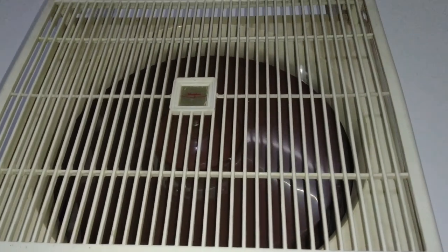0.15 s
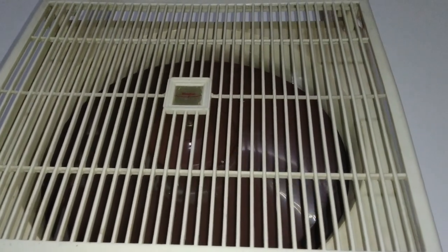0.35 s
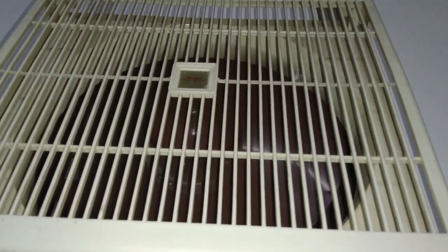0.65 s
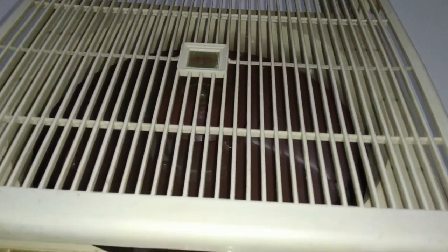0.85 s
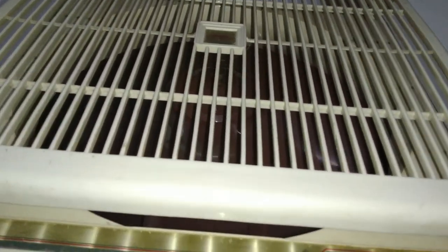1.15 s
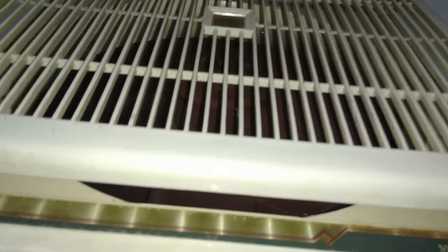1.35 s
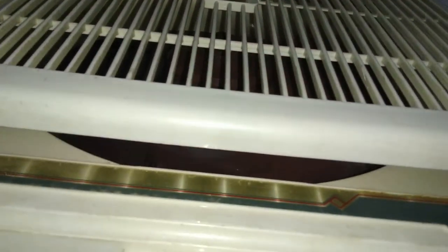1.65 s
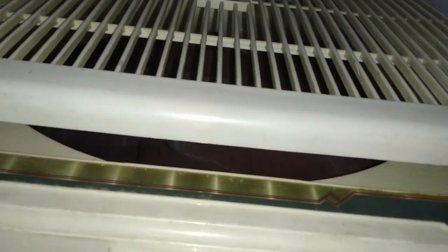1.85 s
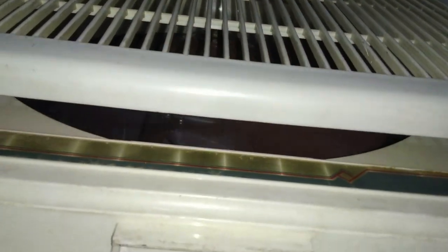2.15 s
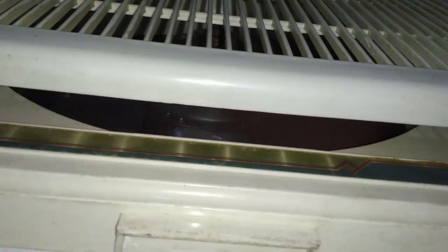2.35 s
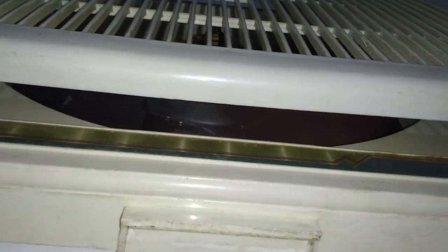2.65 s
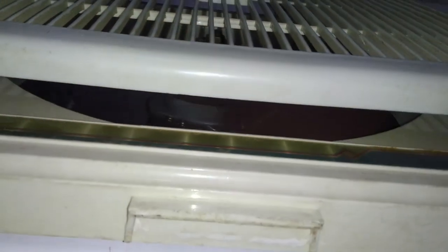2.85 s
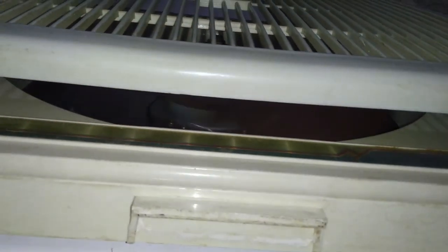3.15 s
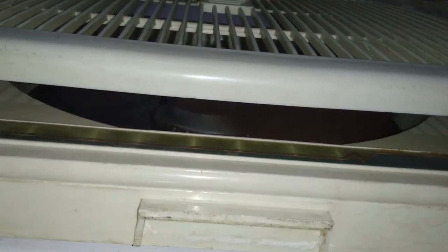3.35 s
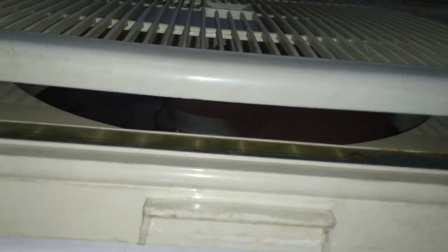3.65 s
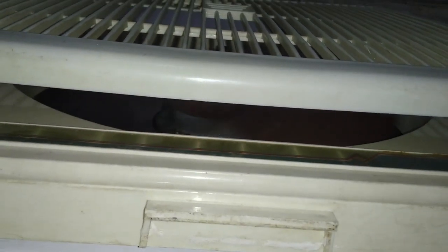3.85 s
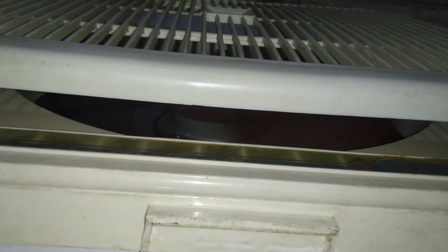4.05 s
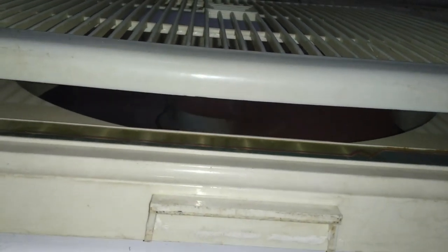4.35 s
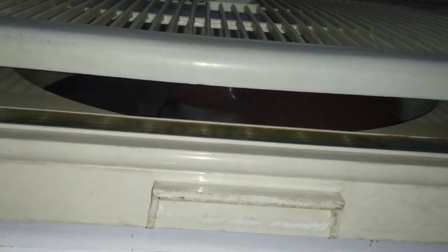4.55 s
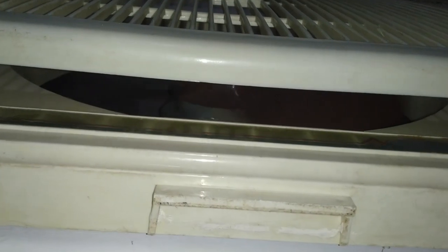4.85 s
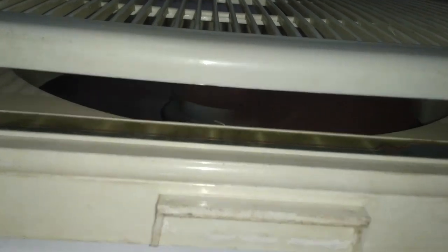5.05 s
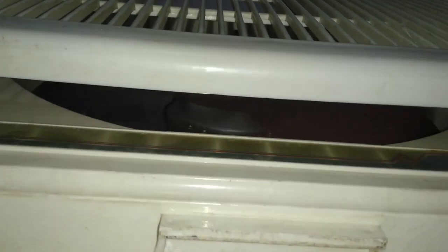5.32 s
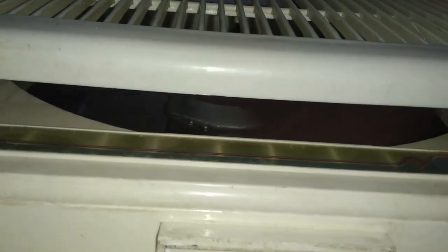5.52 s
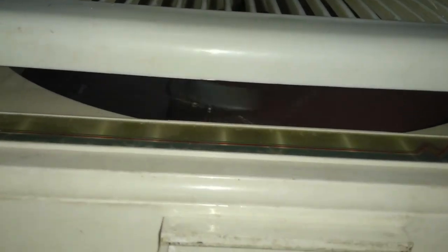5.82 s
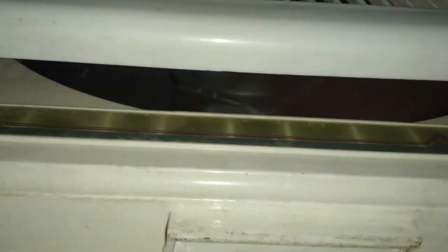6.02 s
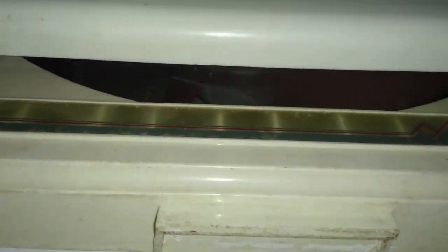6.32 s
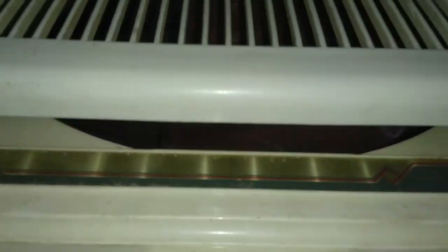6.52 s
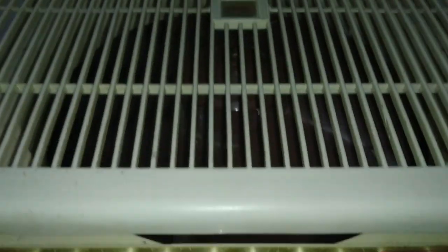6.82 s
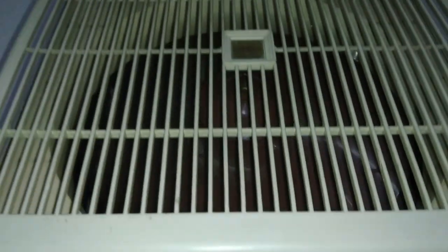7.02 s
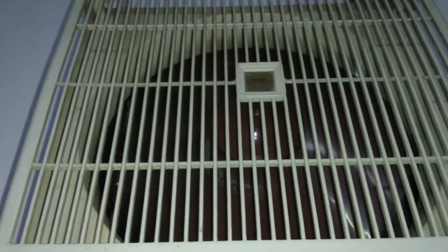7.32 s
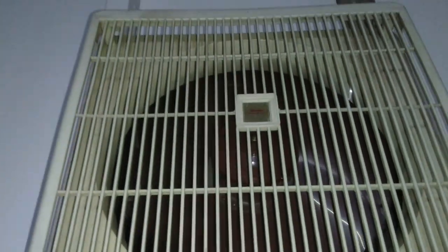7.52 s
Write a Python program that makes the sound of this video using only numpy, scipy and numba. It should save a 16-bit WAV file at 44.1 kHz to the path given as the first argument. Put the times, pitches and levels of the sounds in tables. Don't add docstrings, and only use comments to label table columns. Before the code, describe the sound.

A wall exhaust fan hums low and steady with a fast-throbbing rush of air, heard close up, dulling midway before opening again.

```python
import sys
import numpy as np
from scipy import signal
from scipy.fft import rfft, irfft, next_fast_len
from scipy.io import wavfile
from scipy.ndimage import uniform_filter1d
from numba import njit

SR = 44100
rng = np.random.default_rng(int(sys.argv[2]) if len(sys.argv) > 2 else 0)


def int16_out(signal):
    q = np.round(np.clip(np.atleast_2d(signal).T, -1, 1) * 32767)
    wavfile.write(sys.argv[1], SR, q.astype(np.int16))


def invert_db(x):
    u = np.asarray(x, float) / 20
    return 10 ** u


N = 338501


def between(front, under, depth):
    return front + depth * (under - front)


def walk(rate):
    hold = int(SR / rate)
    steps = np.repeat(rng.standard_normal(N // hold + 1), hold)
    smooth = uniform_filter1d(uniform_filter1d(steps, hold), hold)
    return 1.3 * smooth[:N]


def curves(table):
    seconds, *columns = np.transpose(table)
    return [np.interp(np.arange(N) / SR, seconds, column) for column in columns]


def log_read(table, size):
    log_hz = np.log(np.arange(size // 2 + 1) * SR / size + 1e-3)
    table_hz, table_db = np.transpose(table)
    return np.interp(log_hz, np.log(table_hz), table_db)


def coloured(shape, db, side_shape, side_db, pan, lead=0):
    size = next_fast_len(N)
    hz = np.arange(size // 2 + 1) * SR / size

    def spectrum(table, level_db):
        gain = invert_db(log_read(table, size)) * (hz > table[0][0])
        return gain * invert_db(level_db) / np.sqrt(np.mean(gain ** 2))

    mid = spectrum(shape, db)
    side = spectrum(side_shape, side_db)
    apart = np.clip(hz / 1500 - 3, 0, 1)
    mid = (mid + apart * (side - mid)) * rfft(rng.standard_normal(size))
    side = side * rfft(rng.standard_normal(size))
    half = invert_db(log_read(pan, size) / 2) * np.exp(0.5j * lead * hz / 1000)
    left = irfft((mid + side) * half, size)[:N]
    right = irfft((mid - side) / half, size)[:N]
    return np.array([left, right])


@njit
def band(x, hz, width):
    y, ring, low = np.empty(len(x)), 0., 0.
    for i in range(len(x)):
        g = np.tan(np.pi * hz[i] / SR)
        damping = width / hz[i]
        v = (ring + g * (x[i] - low)) / (1 + g * (g + damping))
        ring, low = 2 * v - ring, low + 2 * g * v
        y[i] = damping * v
    return y


def rumble():
    # frequency in Hz, level in dB per Hz
    duct_colour = [(12, -26.5), (33, -25), (44, 6), (52, 5), (66, 14), (78, 9), (90, 10.5), (106, 11.2),
                   (135, 8.5), (150, 7), (175, 7.5), (200, 4), (235, 1.5), (300, -46.5)]
    level_db, side_db, pan_db = -32, -17.5, -1.8
    return coloured(duct_colour, level_db, duct_colour, level_db + side_db, [(20, pan_db), (300, pan_db)])


def sleeve():
    # frequency in Hz, level in dB per Hz
    cloth_colour = [(2500, -30), (4000, 0), (8000, -5), (11000, 1), (14000, .1), (16000, .1)]
    at_s, length_s, db = 7.455, 0.05, -52.5
    swell = np.exp(-np.abs((np.arange(N) / SR - at_s) / length_s) ** 3)
    return swell * coloured(cloth_colour, db, cloth_colour, db - 0.5, [(2500, -1.5), (16000, -1.5)])


def rush(turn, depth, notch_hz, notch):
    # frequency in Hz, level in dB per Hz
    grille_shared = [(150, -22.5), (260, -0.3), (430, -7), (590, -2.5), (870, -4.5), (1000, -4.5),
                     (1150, -5.5), (1300, -9), (1700, -9), (2200, -16), (2750, -27.5), (3800, -32.5),
                     (4500, -31.5), (16000, -48.5)]
    grille_opposed = [(150, -25), (250, -8), (350, 4), (600, -7.5), (1000, -4), (1600, -0.5), (2000, -8),
                      (2700, -14), (4500, -24), (16000, -26.5)]
    rim_shared = [(150, -7.5), (250, -0.4), (350, -4), (500, -7), (720, -8.5), (1000, -11.5), (1300, -13),
                  (1550, -22), (1900, -22.5), (2200, -21.5), (2800, -36), (3500, -35.5), (4500, -45.5),
                  (16000, -49)]
    rim_opposed = [(150, -30.5), (250, -2), (350, -2.5), (500, -4.5), (800, -2.5), (1100, -10), (1500, -7),
                   (2000, -12), (2700, -21.5), (4500, -28), (16000, -32.5)]
    # frequency in Hz, left minus right in dB
    grille_pan = [(60, -1.0), (110, -2), (200, 4), (380, -1), (700, -2.5), (1290, 0), (2380, -0.5),
                  (4400, -5), (8120, -1.5), (15000, -5)]
    rim_pan = [(60, -1.5), (110, -2), (200, 4.5), (380, -6), (700, -3.5), (1290, 0.0), (2380, 1.5),
               (4400, -1.5), (8120, -1), (15000, -2.5)]
    grille = coloured(grille_shared, -36, grille_opposed, -44, grille_pan, lead=-0.2)
    rim = coloured(rim_shared, -38, rim_opposed, -46, rim_pan, lead=0.32)
    air = np.sqrt(1 - depth) * grille + np.sqrt(depth) * rim

    air = air - notch * band(air.mean(axis=0), notch_hz, 190.0)
    ridge_hz = np.full(N, 1320.0)
    air = air + 0.32 * depth * band(air.mean(axis=0), ridge_hz, 120.0)
    air = air - 0.41 * notch * band(air.mean(axis=0), 1.46 * notch_hz, 200.0)

    throb_db, treble_throb_db, lag_turns, swirl_db = 1.64, 1.4, 0.27, 0.54
    beat = (1 + 0.2 * walk(4.87)) * np.cos(turn - 2 * np.pi * lag_turns)
    low = signal.lfilter(*signal.butter(1, 5000, fs=SR), air)
    throbbing = low * invert_db(throb_db * beat) + (air - low) * invert_db(treble_throb_db * beat)
    return throbbing * invert_db(swirl_db * walk(6))


def blade_tone(turn, depth, distance):
    # multiple of the blade rate, level before the grille in dB, level under the rim in dB
    overtones = [(1, -27.5, -28), (2, -44.5, -40.5), (3, -51, -47), (4, -53, -44), (5, -47.5, -65.5),
                 (6, -56, -53.5), (7, -55.5, -60), (8, -58.5, -64.5)]
    # multiple, left minus right in dB, left lead in rad, flutter in dB, flutter in rad
    tone_ports = [(1, -1.5, -.05, 0.56, .05), (2, -5.5, -0.017, 1.7, 0.12), (3, -5, 0.98, 2, 0.89),
                  (4, -5.5, .3, 1, .1), (5, 0.5, -0.8, 1.8, 0.1), (6, 8, 1.1, 4, 1.5), (7, 1, 1.7, 5, 0.52),
                  (8, 1.5, .1, 2, 0.59)]
    near_m, skew_rad, bend_rad = 0.3, 1.21, 0.242
    shaded = depth ** 2 * (3 - 2 * depth)
    level_db = {k: between(front, under, shaded) for k, front, under in overtones}
    tone = 0
    side = np.array([[0.5], [-0.5]])
    for k, pan_db, lead, flutter_db, flutter_rad in tone_ports:
        nearness = (near_m / distance) ** (1 / k)
        size = np.sqrt(2) * invert_db(level_db[k] + flutter_db * walk(9)) * nearness
        skew = skew_rad * (k - 1) - bend_rad * (k - 1) ** 2
        phase = k * turn + skew + flutter_rad * walk(7)
        tone = tone + size * invert_db(side * pan_db) * np.cos(phase + side * lead)
    return tone


def scene():
    # time in seconds, depth under the rim from 0 to 1, extra path of the ledge echo in m,
    # distance to the blades in m
    phone_path = [(0, 0.04, 0.22, 0.39), (1, 0.05, .18, .3), (1.5, 0.47, 0.19, .28),
                  (2.2, 0.74, 0.18, 0.32), (3, 0.9, 0.17, 0.31), (4, .93, .162, 0.31),
                  (4.6, 0.94, 0.155, 0.32), (5.5, 0.86, 0.17, 0.28), (6.3, 0.81, 0.186, 0.27),
                  (6.8, 0.4, .176, 0.28), (7.2, 0.12, .175, 0.35), (7.68, 0.09, .175, 0.48)]
    depth, detour, distance = curves(phone_path)
    depth = np.clip(depth, 0, 1)
    notch = np.clip(between(0.2, 0.65, depth), 0, 1)
    notch_hz = 343 / (2 * detour)

    blade_hz, wander_hz = 117.33, 0.079
    turn = 2 * np.pi * np.cumsum(blade_hz + wander_hz * walk(1)) / SR
    tone = blade_tone(turn, depth, distance)
    air = invert_db(between(-0.74, 1, depth)) * rush(turn, depth, notch_hz, notch)
    gust_db = 0.5 * walk(1.49)
    eddies = invert_db(between(-2.5, -1.5, depth) + gust_db) * rumble()
    return tone + air + eddies + sleeve()


def band_limit(x):
    return signal.sosfilt(signal.butter(12, 15720, fs=SR, output="sos"), x)


def record(dry):
    # frequency in Hz, gain in dB
    port_colour = [(4800, -0.03), (5800, -4.5), (6600, -8.5), (7300, -14), (8000, -15.5), (8700, -10.5),
                   (9400, -7.5), (11700, -4.5), (13000, -6.5), (14200, -11), (15500, -15)]
    edge = SR // 10
    size = next_fast_len(N + 2 * edge)
    longer = np.pad(dry, ((0, 0), (edge, edge)), mode="reflect", reflect_type="odd")
    filtered = irfft(rfft(longer, size) * invert_db(log_read(port_colour, size)), size)
    heard = filtered[:, edge:edge + N]
    fade_out_s = 0.005
    seconds_left = np.arange(N)[::-1] / SR
    fade = np.sin(np.pi / 2 * np.clip(seconds_left / fade_out_s, 0, 1)) ** 2
    return band_limit(heard * fade)


dry = scene()
out = record(dry)
int16_out(out)
```